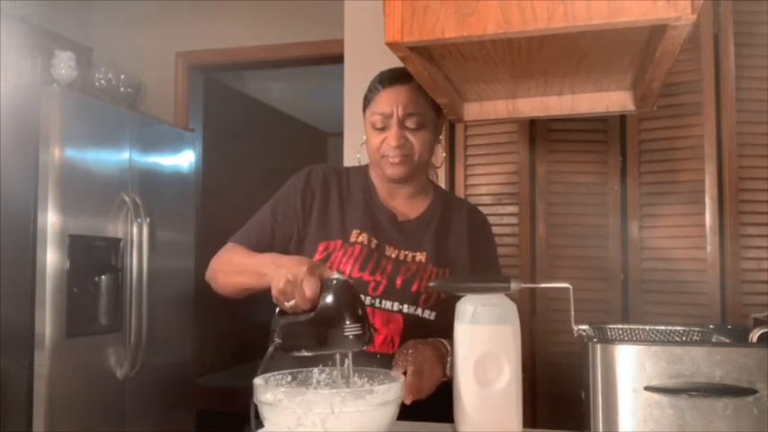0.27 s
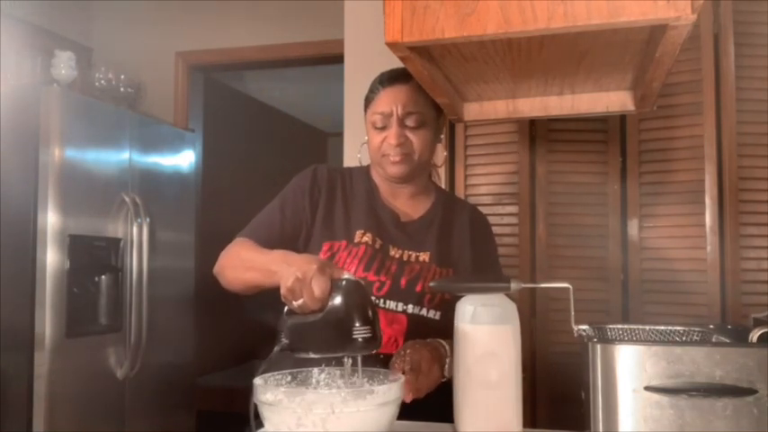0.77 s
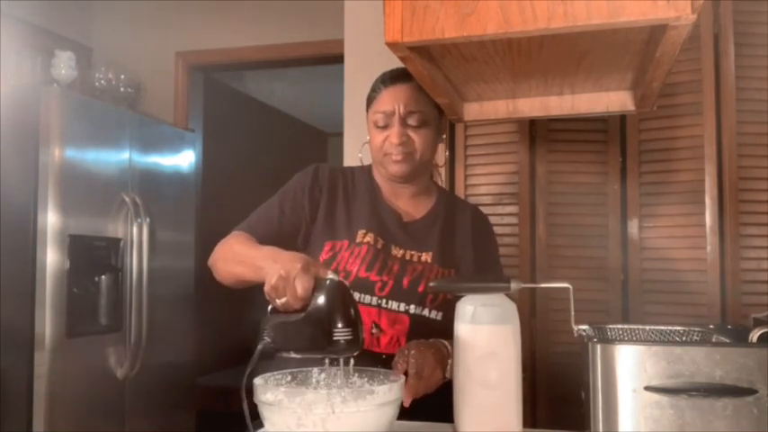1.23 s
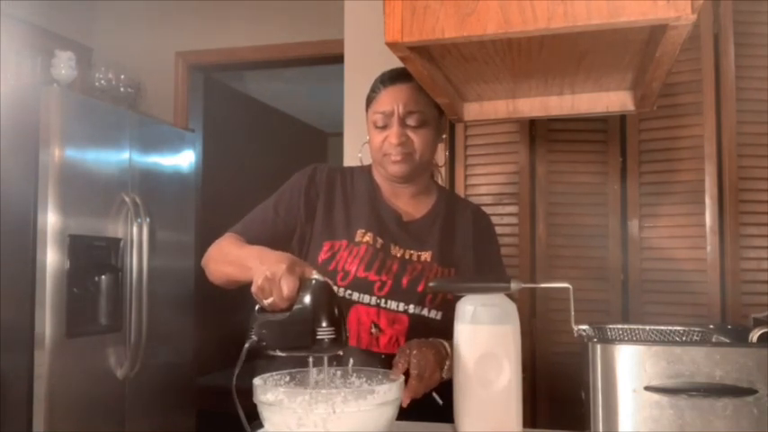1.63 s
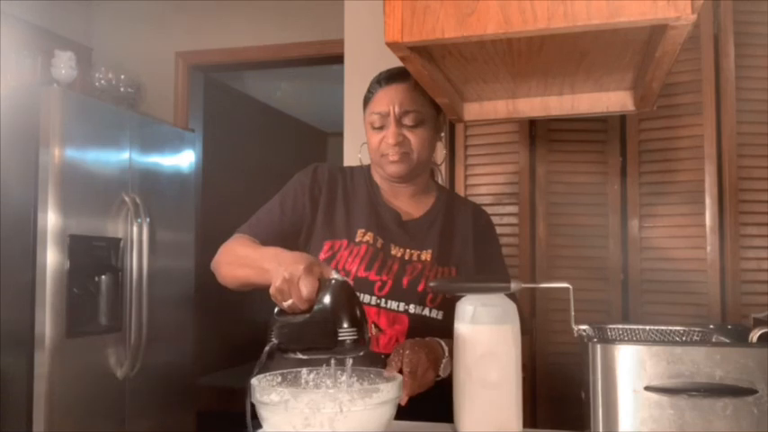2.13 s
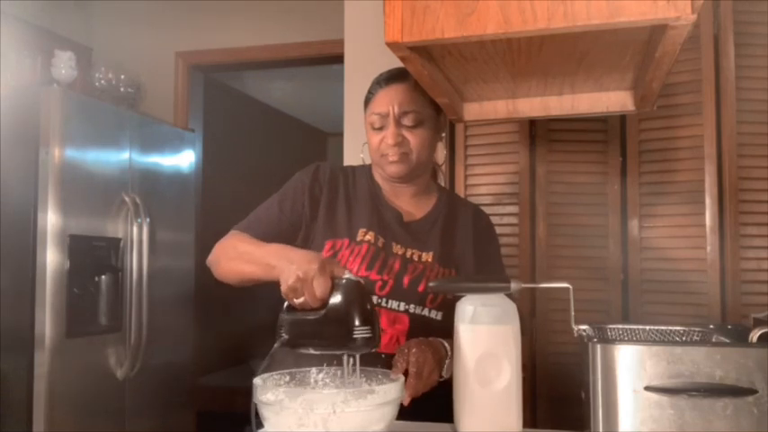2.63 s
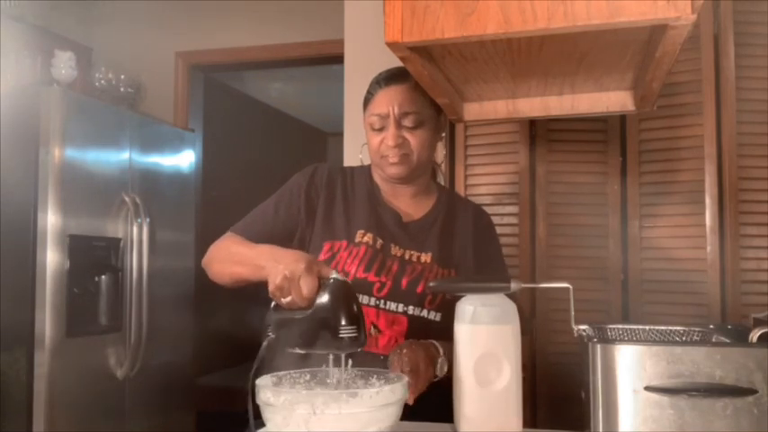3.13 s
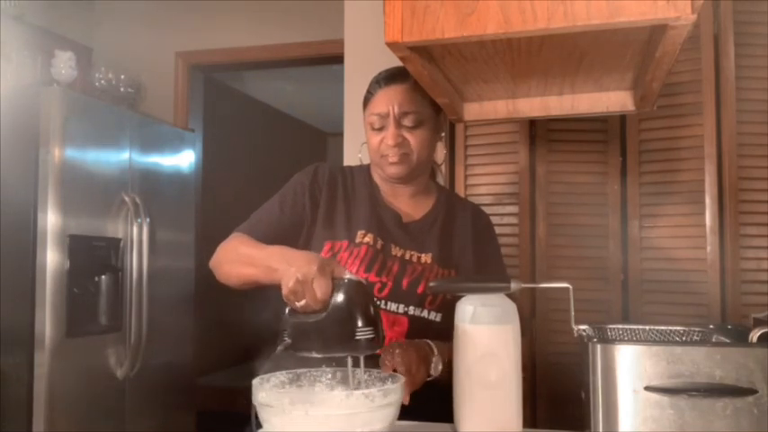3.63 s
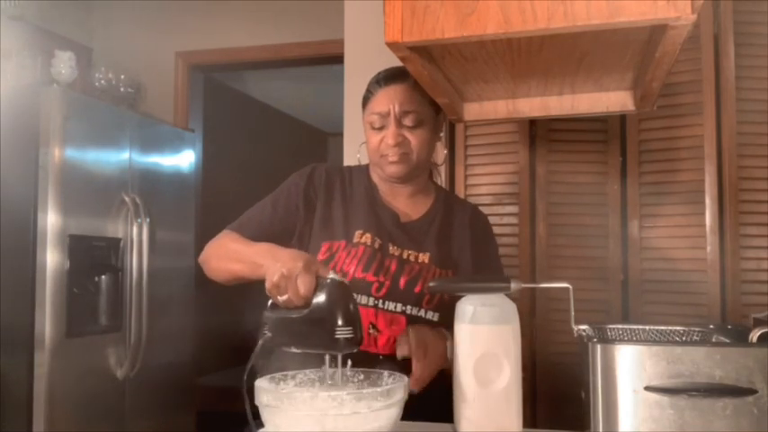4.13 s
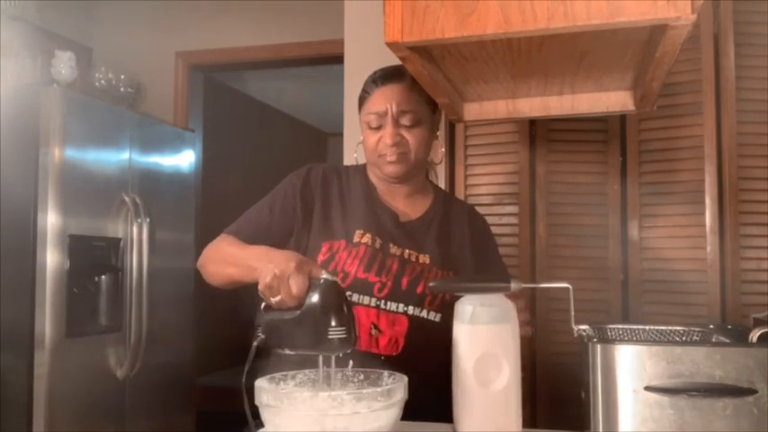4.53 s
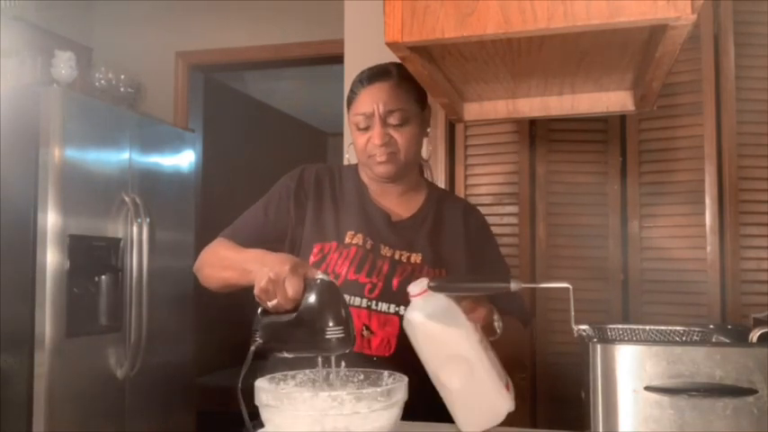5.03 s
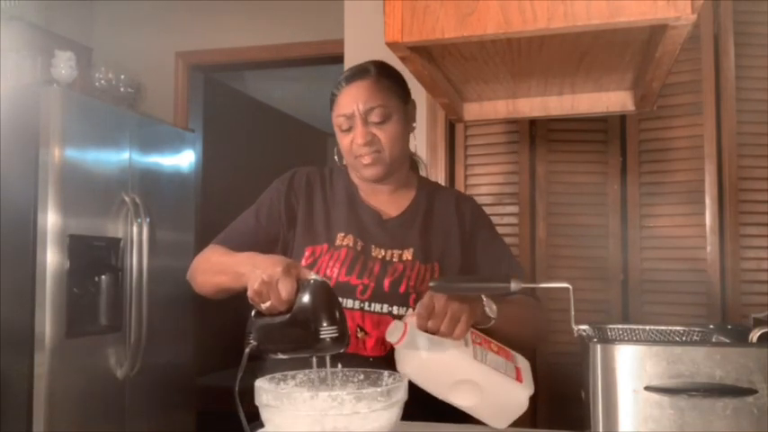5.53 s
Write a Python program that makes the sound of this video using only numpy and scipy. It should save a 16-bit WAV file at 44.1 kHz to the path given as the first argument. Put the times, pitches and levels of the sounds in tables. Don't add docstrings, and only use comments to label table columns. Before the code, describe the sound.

An electric hand mixer whines steadily while whipping thick icing, with three short rattling bursts of bowl rumble, glassy clatter and dull counter knocks.

```python
import sys
import numpy as np
from scipy import signal
from scipy.fft import rfft, irfft
from scipy.io import wavfile
from scipy.ndimage import uniform_filter1d

SR = 44100
rng = np.random.default_rng(int(sys.argv[2]) if len(sys.argv) > 2 else 0)


def invert_db(level):
    return 10 ** (np.asarray(level, dtype=float) / 20)


def int16_out(signal):
    q = np.round(np.clip(np.atleast_2d(signal).T, -1, 1) * 32767)
    wavfile.write(sys.argv[1], SR, q.astype(np.int16))


N = 255383
PULL_HZ = 120


def evened(x):
    return x / np.sqrt(np.mean(x ** 2, -1, keepdims=True) + 1e-20)


def read(hz, points, values):
    return np.interp(np.log(hz + 1), np.log(np.add(points, 1)), values)


def drift(per_s, count):
    steps = rng.standard_normal((count, N // 64 + 2000))
    smooth = signal.butter(2, per_s, fs=SR / 64, output="sos")
    steps = evened(signal.sosfilt(smooth, steps)[:, 1998:])
    return [np.interp(np.arange(N) / 64, np.arange(len(s)), s) for s in steps]


def ring(x, modes):
    return sum(invert_db(db) * signal.lfilter(*signal.iirpeak(hz, hz / width, SR), x) for hz, width, db in modes)


# (time [s], shaft speed [turns/s])
SHAFT_SPEED = [(0.0, 290.9), (0.2, 289.6), (0.7, 280.2), (1.17, 284.5), (1.29, 281.6), (1.6, 287.2),
               (2.03, 287.6), (2.3, 276.2), (2.5, 278.1), (2.95, 288), (3.45, 288.8), (3.73, 284),
               (4.0, 286.6), (4.13, 282.3), (4.4, 285.1), (4.63, 280.8), (4.95, 287.9), (5.4, 285.2)]


def shaft_speed():
    return np.interp(np.arange(N) / SR, *np.transpose(SHAFT_SPEED))


STRONG_ORDERS = [1, 2, 5, 7, 8, 9, 10, 11, 13, 14, 15, 17, 22, 25, 30, 33, 34, 36, 37, 38, 44, 52]
STRONG_DB = [-46, -50, -51, -48, -54, -53, -52, -54, -58, -57, -60, -60, -66, -59, -59, -58, -59, -54, -56,
             -63, -60, -67]
SPLIT_LINES = [(2, 1), (3, 1), (4, 1), (5, -1), (7, 1), (12, -1), (12, 1), (24, -1), (24, 1), (36, 1)]
SPLIT_LINES_DB = [-54, -53, -52, -51, -54, -55, -51, -57, -63, -65]
BEAMING_ORDERS = [12, 24, 32, 35]
POINTED_AWAY_DB = [-51.5, -51, -68.5, -51]
# (time [s], half length [s], gain [dB])
BEAM_SWINGS = [
    [(0.55, 0.54, 4), (1.42, 0.19, 9), (2.1, 0.38, 5), (2.6, 0.18, 8), (3.2, 0.22, 0), (3.72, 0.33, 11),
     (4.45, .1, 0)],
    [(0.85, .35, 6), (1.45, 0.35, 0.5), (2.7, 0.11, 3), (3.3, 0.085, 7.5), (3.8, 0.096, 10.5),
     (4.5, 0.23, 3.5)],
    [(1.5, 0.064, 7), (1.88, .07, 6), (2.8, .13, 10), (3.35, .1, 8), (3.75, .07, 9), (5.3, 0.5, 10)],
    [(0.4, 0.31, -6), (0.83, .12, 2), (2.78, 0.34, 1), (3.65, 0.43, 7), (4.25, 0.071, 2), (5.4, 0.28, -2)],
]


def whine(jitter_hz=0.394, wobble=1.0, weak_db=-70):
    t, waver_db, flutter_db = np.arange(N) / SR, 4., 4.2
    turns = np.cumsum(shaft_speed() + jitter_hz * drift(31.5, count=1)[0]) / SR
    fades, slips = drift(2.6, count=23), drift(8.8, count=11)

    steady = [(k, 0, db) for k, db in zip(STRONG_ORDERS, STRONG_DB)]
    steady += [(k, side, db) for (k, side), db in zip(SPLIT_LINES, SPLIT_LINES_DB)]
    steady += [(k, 0, weak_db) for k in range(39, 55) if k not in STRONG_ORDERS]

    lines = []
    for n, (k, side, db) in enumerate(steady):
        depth_db = min(k / 30 + 0.28, 1) * waver_db
        lines.append((k, side, db + depth_db * (fades[n % 23] - .5)))
    for k, db, swings in zip(BEAMING_ORDERS, POINTED_AWAY_DB, BEAM_SWINGS):
        beam_db = sum(gain_db * np.exp(-((t - s) / half) ** 2) for s, half, gain_db in swings)
        lines.append((k, 0, db + beam_db))

    starts = rng.random(len(lines))
    out = np.zeros((2, N))
    for n, (k, side, db) in enumerate(lines * 2):
        view, line = divmod(n, len(lines))
        phase = 2 * np.pi * (k * turns + side * PULL_HZ * t + starts[line])
        phase = phase + wobble * min(k / 10 + 0.46, 1) * slips[n % 11]
        flutter = min(k / 12, 1) * flutter_db * (slips[(n + 5) % 11] - 0.01)
        out[view] += invert_db(db + flutter) * np.sqrt(2) * np.cos(phase)
    return out


# (frequency [Hz], density [dB per Hz])
AIR_AND_GEARS = [(28, -53), (50, -45), (90, 7.5), (200, -9), (380, -20.5), (900, -8), (2300, 3), (3800, -1),
                 (5000, -1.5), (6300, -5.5), (8500, 3), (10000, -3.5), (11800, -6), (15700, -9.5)]
# (frequency [Hz], width [Hz], level over
# the hiss [dB])
HISS_HUMPS = [(63, 12.7, 12.5), (647, 124, 22.5), (1297, 250, 12.5), (2060, 330, 6.5),
              (2760, 1040, -5.5), (3950, 95, 6), (13100, 240, -3)]


def hiss(level_db=-34.5, patchy_db=2.1, swell_db=0.88, pull=0.058):
    frames, hz = N // 256 + 5, np.fft.rfftfreq(1024, 1 / SR)
    a, b, c, d, patches = rng.standard_normal((frames, 513, 5)).T
    patches = uniform_filter1d(uniform_filter1d(patches, 14, 0), 16, 1)
    humps = 1 + sum(invert_db(db) / (1 + (2 * (hz - f) / width) ** 2) for f, width, db in HISS_HUMPS)
    colour = invert_db(read(hz, *np.transpose(AIR_AND_GEARS))) * humps
    z = np.array([a + 1j * b, c + 1j * d]) * colour[:, None] * invert_db(patchy_db * patches / patches.std())
    noise = evened(signal.istft(z, nperseg=1024, noverlap=768)[1][:, :N])
    throb = 1 + pull * np.cos(2 * np.pi * PULL_HZ * np.arange(N) / SR)
    swell = invert_db(level_db + swell_db * drift(0.82, count=1)[0])
    return swell * throb * noise


# (start [s], hold [s], drag on counter [dB],
# beater on glass [dB], wire buzz [dB])
HAND_SHOVES = [(0.0, 0.43, -29.5, -34, -43), (0.053, 0.014, -53, -30, -56), (0.283, 0.047, -24.5, -48, -60),
               (0.48, 0.059, -19.5, -28.5, -41), (0.57, 0.021, -17.5, -24, -50),
               (0.609, 0.099, -19, -32.5, -51), (0.76, 0.14, -32, -47, -62), (2.05, .03, -30, -29, -36),
               (2.089, 0.018, -22.5, -23, -32.5), (2.131, 0.15, -18, -25, -33.5),
               (2.319, 0.036, -21, -29.5, -51), (2.42, 0.077, -25, -32, -50),
               (3.399, 0.07, -24, -29.5, -36), (3.463, 0.075, -16, -26, -38), (3.558, .11, -19.5, -25, -36),
               (3.693, 0.11, -26.5, -25, -36), (3.835, 0.026, -26.5, -26, -48),
               (3.887, 0.12, -34, -35.5, -52), (3.994, 0.072, -31, -43, -62), (4.426, .06, -41, -33.5, -38),
               (4.5, 0.12, -38, -58, -52)]


def shoved(column, rest_db, trim_db):
    rise_db_per_s, fall_db_per_s, wander_db = 600, 217, 1.5
    at = np.arange(0, N + 64, 64)
    t = at / SR
    wander = drift(7.1, count=1)[0][np.minimum(at, N - 1)]
    power = invert_db(2 * (rest_db + wander_db * wander))
    for row in HAND_SHOVES:
        start, hold = row[:2]
        early, late = np.maximum(start - t, 0), np.maximum(t - start - hold, 0)
        shove_db = row[column] + trim_db - rise_db_per_s * early - fall_db_per_s * late
        power = power + invert_db(2 * shove_db)
    return np.interp(np.arange(N) / SR, t, 10 * np.log10(power))


def rattle(level_db, modes, per_s, spread_db, hold_s, band_hz):
    bumps = (rng.random(N) < per_s / SR) * invert_db(spread_db * np.minimum(rng.exponential(1, N), 4))
    rung = ring(bumps * rng.standard_normal((2, N)), modes)
    rung = signal.sosfilt(signal.butter(5, band_hz, "band", fs=SR, output="sos"), rung)
    rung /= np.sqrt(abs(uniform_filter1d(rung ** 2, round(hold_s * SR))) + 1e-12)
    return invert_db(level_db) * rung


# (frequency [Hz], width [Hz], level [dB])
COUNTER_MODES = [(132, 3.8, 0.5), (139.5, 24, 2.5), (183, 120, -12.5), (269.8, 16, -1)]
# (frequency [Hz], width [Hz], level [dB])
BOWL_MODES = [(441.4, 91, 4.5), (481, 21, 2.5), (553, 35, 3.5), (653, 32, 8.5), (769, 19, 4.5)]
# (frequency [Hz], width [Hz], level [dB])
SCRAPE_MODES = [(970, 80, 0), (1150, 150, -3), (1380, 160, -1), (1750, 200, -4), (2600, 1200, -12)]
# (frequency [Hz], width [Hz], level [dB])
WIRE_MODES = [(4600, 1500, -7), (7300, 300, -3), (8100, 300, -3), (8800, 200, 3), (10100, 400, -2),
              (11900, 400, -3), (13500, 2000, -14), (9000, 4000, -12)]


def turning(lope=0.1, blades=0.17):
    shaft_turns_per_beater_turn = 19.7
    beater = 2 * np.pi * np.cumsum(shaft_speed()) / SR / shaft_turns_per_beater_turn

    drag_db = shoved(column=2, rest_db=-39.5, trim_db=-4.1)
    rumble = rattle(drag_db, COUNTER_MODES, 900, 2.1, 0.0487, band_hz=(122, 305))
    boom_db = shoved(column=3, rest_db=-49, trim_db=-4.5)
    boom = rattle(boom_db, BOWL_MODES, 3000, 0.32, 0.053, band_hz=(340, 1000))
    scrape_db = shoved(column=3, rest_db=-46.5, trim_db=-7.0)
    scrape = rattle(scrape_db, SCRAPE_MODES, 5000, 2.5, 0.031, band_hz=(800, 5000))
    buzz_db = shoved(column=4, rest_db=-111, trim_db=-3)
    chatter = rattle(buzz_db, WIRE_MODES, 5400, 4.6, 0.088, band_hz=(3500, 13000))

    lopsided = 1 + lope * np.cos(beater)
    bladed = 1 + blades * np.cos(4 * beater)
    return rumble * lopsided + (boom + scrape + chatter) * bladed


# (time [s], peak level [dB], pitch [Hz])
COUNTER_KNOCKS = [(0.13, -21, 134), (0.289, -12.5, 135.6), (0.769, -11, 143), (1.605, -15, 147),
                  (1.763, -22, 142), (2.054, -25, 290), (2.079, -37, 136), (2.437, -30, 136),
                  (2.484, -18, 270), (2.557, -24, 142), (3.397, -13, 132), (3.778, -10, 148.4),
                  (3.989, -14.5, 146), (4.409, -19, 610), (4.43, -23, 680), (4.484, -23, 143),
                  (4.619, -26, 156), (4.824, -21.5, 145.5)]


def knocks(cycles=24.3, rise=0.67, trim_db=-5.5):
    out, t = np.zeros(N + SR), np.arange(SR // 4) / SR
    for s, db, hz in COUNTER_KNOCKS:
        tones = np.sin(2 * np.pi * hz * t) + 0.18 * np.sin(2 * np.pi * 1.15 * hz * t)
        decay = invert_db(db + trim_db - 60 * t * np.sqrt(140 * hz) / cycles)
        onset = 1 - np.exp(-t * hz / rise)
        out[round(s * SR):][:len(t)] += decay * onset * tones
    return out[:N]


# (time [s], peak level [dB], low ring [dB], share of wire ring [0-1])
BEATER_TICKS = [(0.5035, -23.5, 12.5, 0.1), (0.5715, -14.5, 7.5, 0.3), (0.5894, -14.5, 8, 0.06),
                (0.6044, -17, 0, 0.2), (0.63, -24, -5, 0.1), (0.655, -23, -2, 0.1), (2.108, -25, 12, 0),
                (3.5284, -23, 1, 0), (3.5603, -30, -8, 0), (2.0867, -19.5, 5, 1), (2.1336, -20, -4, 1),
                (2.1494, -40, 3, 0.85), (2.188, -30, -1, 0.85), (2.206, -33, -7, 1), (2.2214, -26, -8, 1),
                (2.2594, -29, -9, 1), (2.2794, -24, -7, 1), (2.4276, -22, -8, 1), (3.5994, -20, 7, 0.85),
                (3.7395, -21, -8, 1), (3.761, -39, 0, 0.9), (4.4592, -32, -6, 1)]
# (frequency [Hz], width [Hz], level [dB])
GLASS_MODES = [(1000, 120, -2), (1750, 200, -3), (2900, 300, -4), (4550, 220, 3), (5150, 220, 2),
               (7200, 300, -3)]


def ticks(trim_db=2.5):
    glass, wire, low = np.zeros((3, N))
    rub = np.exp(-np.arange(900) / SR / .003)
    cracks = rng.standard_normal((len(BEATER_TICKS), 900)) * rub
    cracks[:, 0] += 5
    for (s, db, low_db, share), crack in zip(BEATER_TICKS, cracks):
        start = round(s * SR)
        at, share = slice(start, start + 900), np.clip(share, 0, 1)
        glass[at] += invert_db(db) * (1 - share) * crack
        wire[at] += invert_db(db) * share * crack
        low[at] += invert_db(db + low_db) * crack
    rung = ring(low, GLASS_MODES[:3]) + ring(glass, GLASS_MODES[3:]) + ring(wire, WIRE_MODES)
    return invert_db(trim_db) * signal.sosfilt(signal.butter(4, 12500, fs=SR, output="sos"), rung)


# (frequency [Hz], time to fall 60 dB [s])
KITCHEN_DECAY = [(100, 0.36), (500, 0.11), (3000, 0.13), (12000, 0.13)]


def room(x):
    taps = np.zeros((2, SR // 2))
    at = np.arange(100, SR // 2 - 20, 20) + rng.integers(0, 20, (2, (SR // 2 - 101) // 20))
    np.put_along_axis(taps, at, rng.choice([-1., 1.], at.shape), 1)
    hz, t, z = signal.stft(taps, SR, nperseg=256)
    t60 = read(hz, *np.transpose(KITCHEN_DECAY))[:, None]
    tail = signal.istft(z * invert_db(-60 * t / t60), SR, nperseg=256)[1]
    return signal.oaconvolve(x[None], tail / np.linalg.norm(tail[0]), axes=1)[:, :N]


def scene():
    tick = ticks()
    blows = knocks() + invert_db(-2) * tick + invert_db(-7) * room(tick)
    return whine() + hiss() + turning() + blows


def top_cut(x):
    return signal.sosfilt(signal.butter(12, 16090, fs=SR, output="sos"), x)


# (frequency [Hz], likeness [0-1], lead of the left [radians], left over right [dB])
MIC_PORTS = [(40, .9, 0, -.3), (130, .995, -.15, -.6), (300, .75, -.3, 0), (620, .35, 1.3, -3),
             (1400, .5, -.3, -1), (1800, .35, -1.5, -1.5), (2300, .3, -3.2, -2), (2700, .35, -.5, -1.5),
             (3900, .6, 0, -.8), (5000, .15, 0, -.8), (6500, .25, .6, -.5), (7300, .85, 2.95, -.2),
             (8200, .975, 3.14, 0), (9500, .99, 3.16, 0), (11500, .4, 4.7, 0), (12700, .95, 6.1, 0),
             (16000, .99, 6.28, 0)]


def record(dry):
    hz = np.fft.rfftfreq(N, 1 / SR)
    points, like, lead, tilt_db = np.transpose(MIC_PORTS)
    like = np.clip(read(hz, points, like), 0, 1)
    left, other = rfft(dry)
    shared = like * np.exp(-1j * read(hz, points, lead)) * left
    right = shared + np.sqrt(1 - like ** 2) * other
    tilt = invert_db(read(hz, points, tilt_db) / 2)
    edge = 1 / (1 + (hz / 15750) ** 200)
    mix = irfft(edge * np.array([left * tilt, right / tilt]), N)
    return top_cut(mix)


dry = scene()
out = record(dry)
int16_out(out)
```